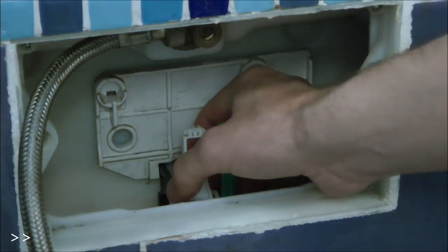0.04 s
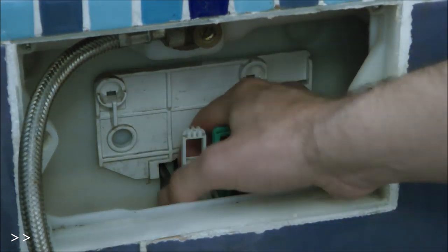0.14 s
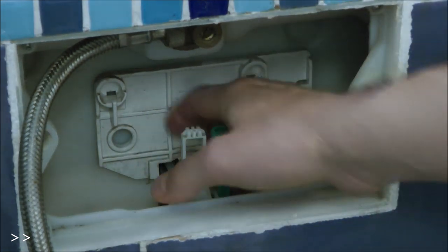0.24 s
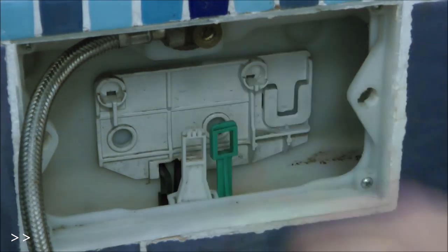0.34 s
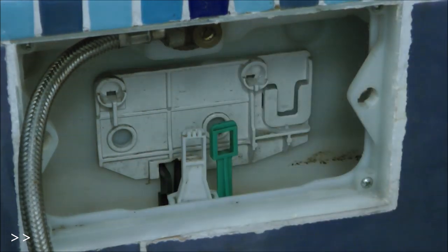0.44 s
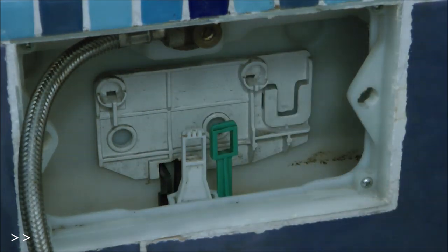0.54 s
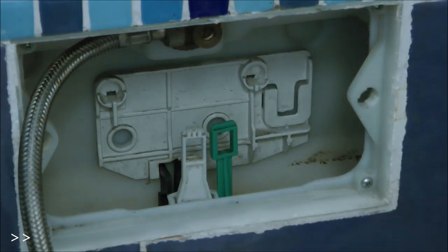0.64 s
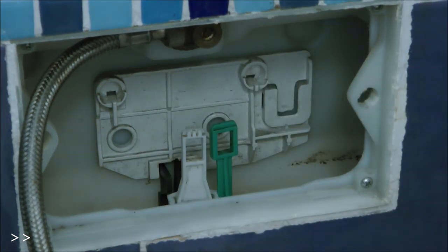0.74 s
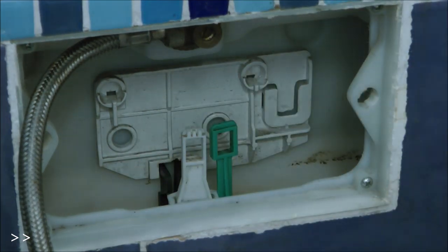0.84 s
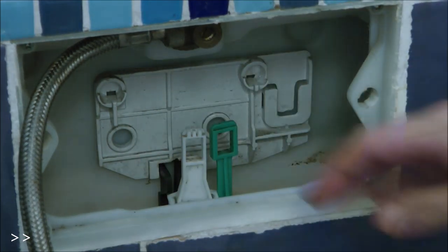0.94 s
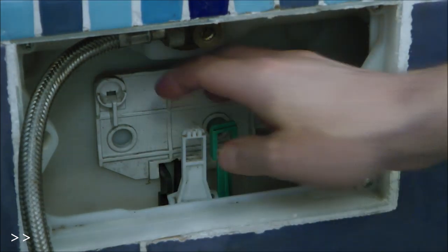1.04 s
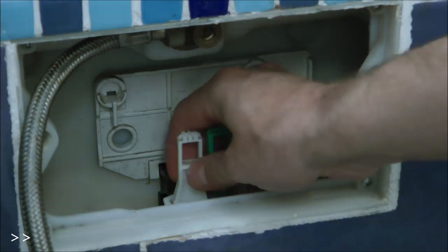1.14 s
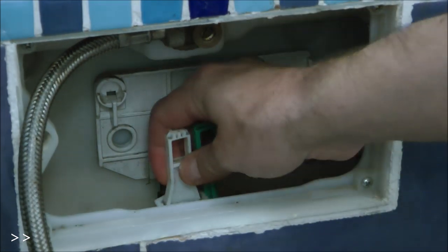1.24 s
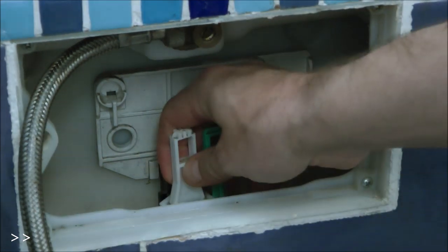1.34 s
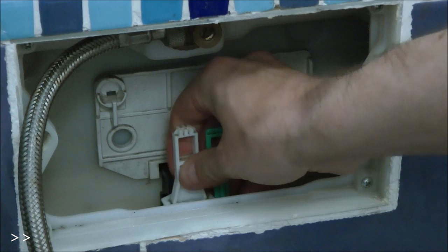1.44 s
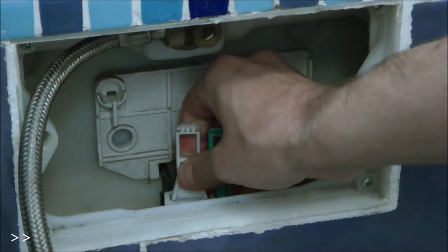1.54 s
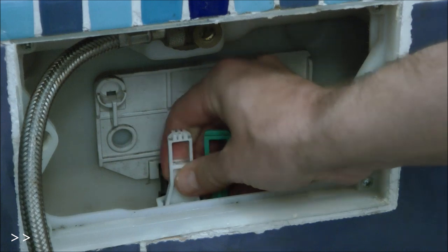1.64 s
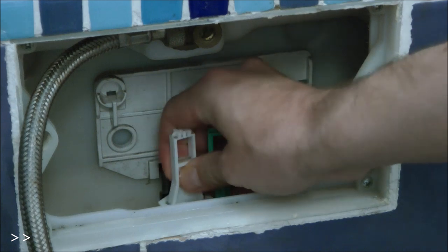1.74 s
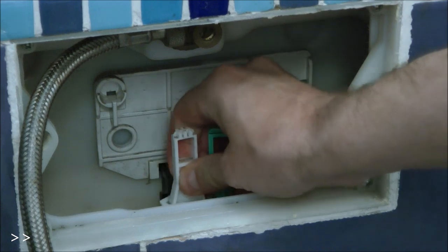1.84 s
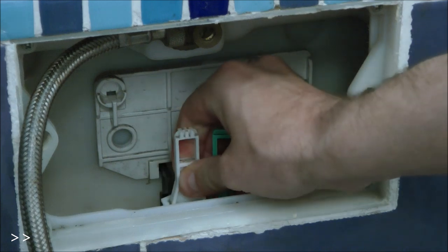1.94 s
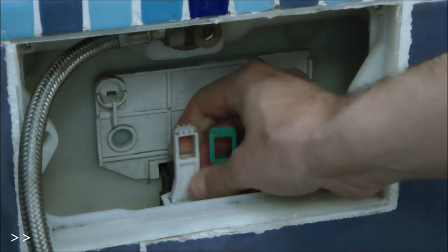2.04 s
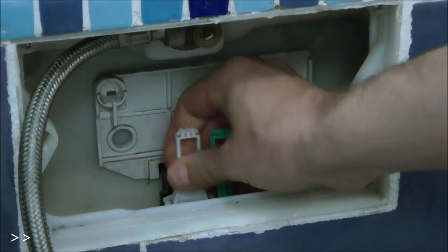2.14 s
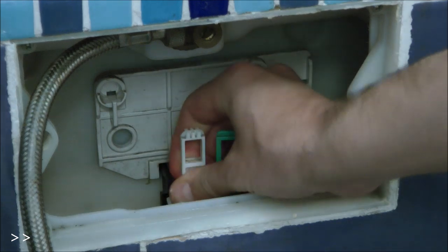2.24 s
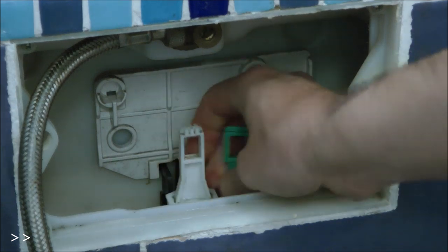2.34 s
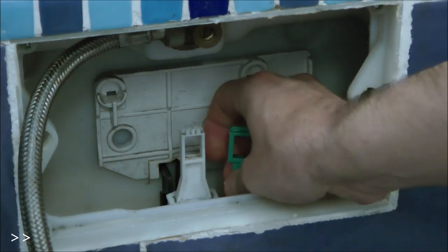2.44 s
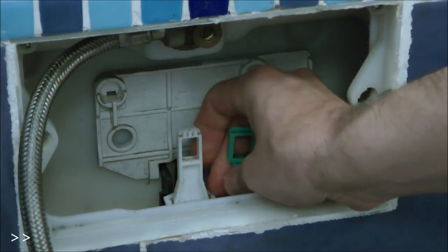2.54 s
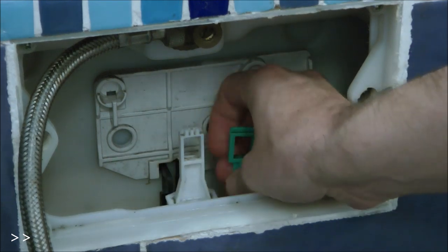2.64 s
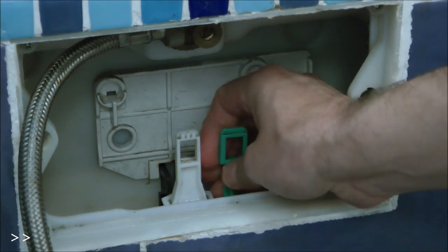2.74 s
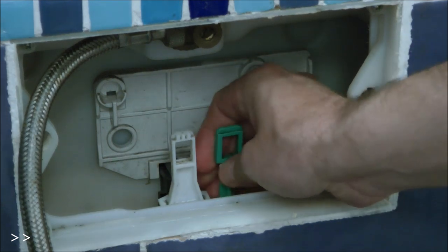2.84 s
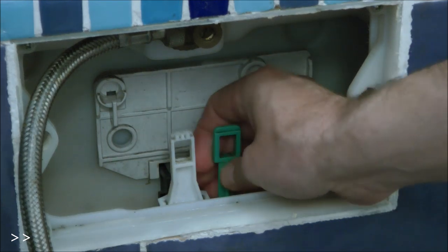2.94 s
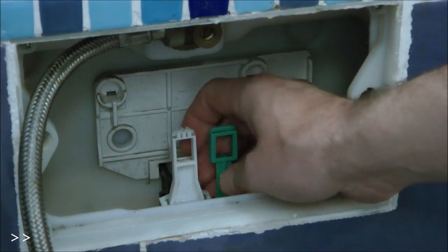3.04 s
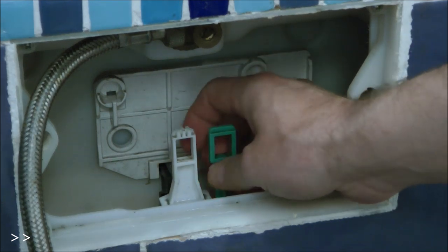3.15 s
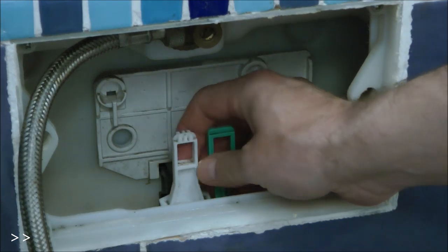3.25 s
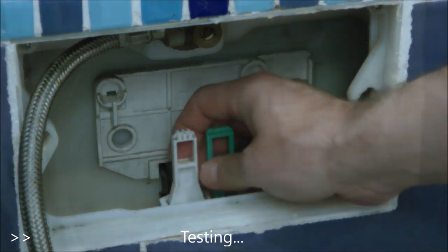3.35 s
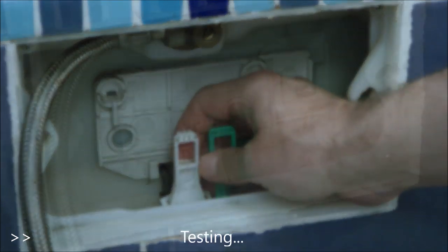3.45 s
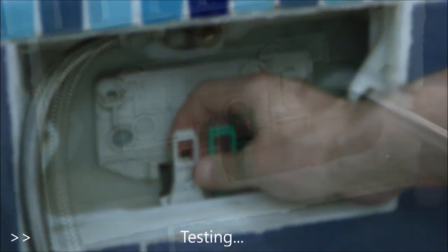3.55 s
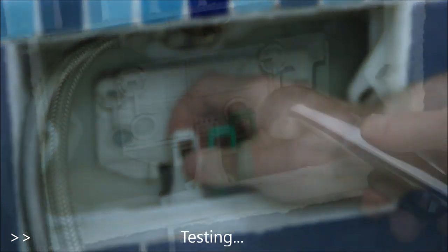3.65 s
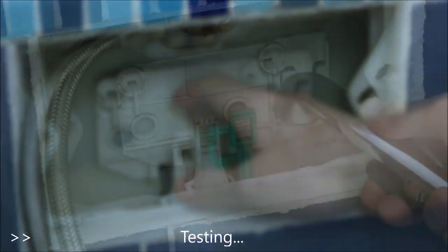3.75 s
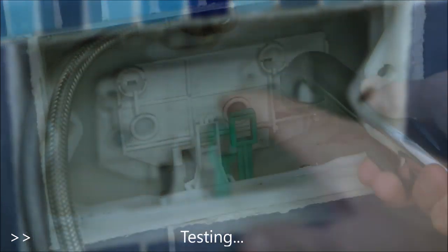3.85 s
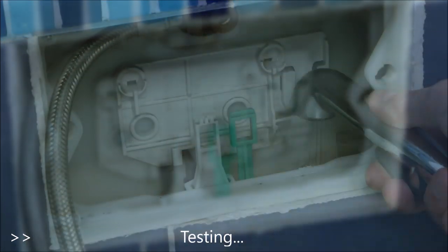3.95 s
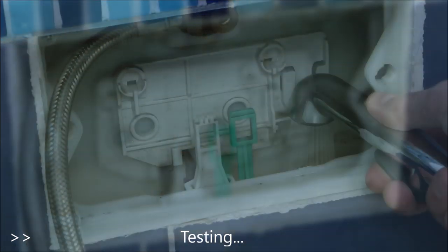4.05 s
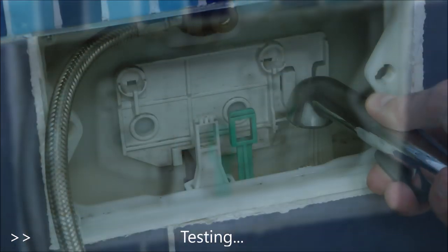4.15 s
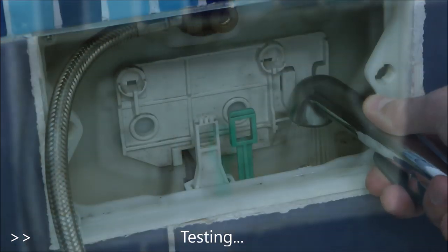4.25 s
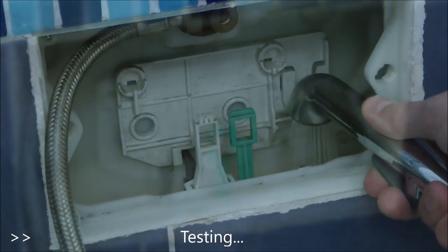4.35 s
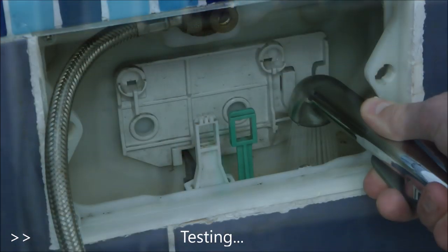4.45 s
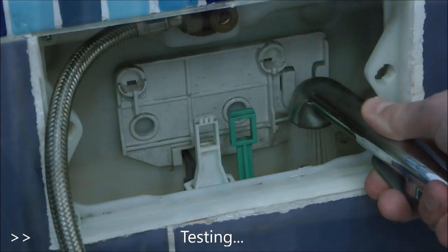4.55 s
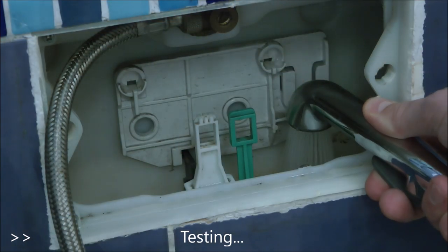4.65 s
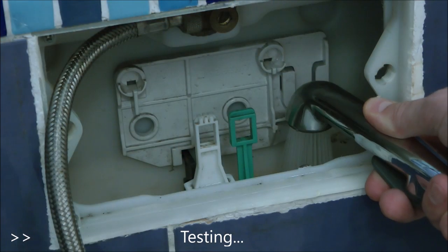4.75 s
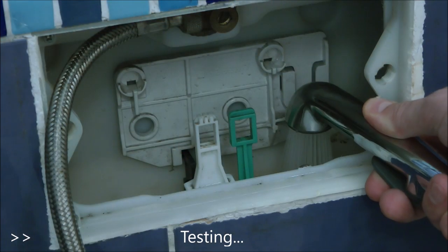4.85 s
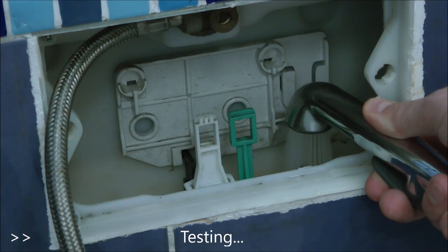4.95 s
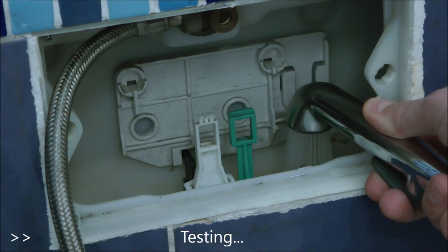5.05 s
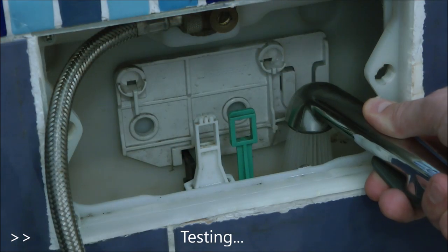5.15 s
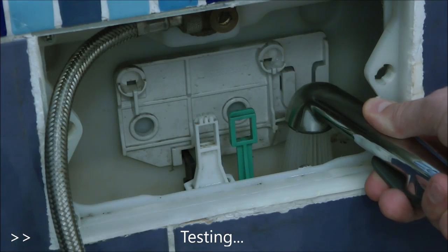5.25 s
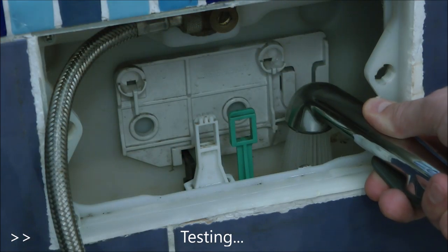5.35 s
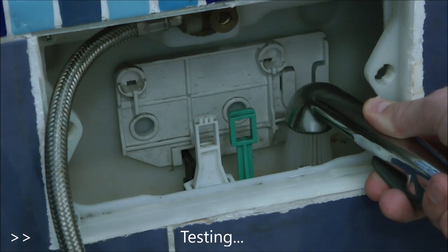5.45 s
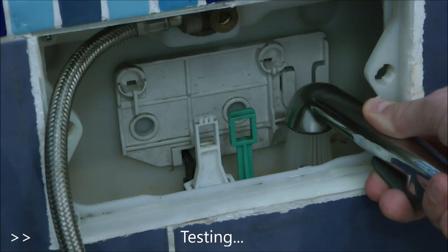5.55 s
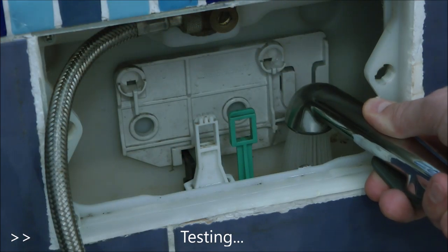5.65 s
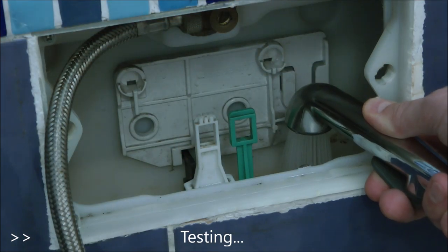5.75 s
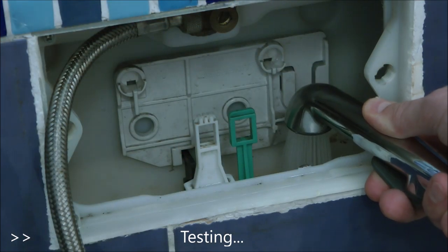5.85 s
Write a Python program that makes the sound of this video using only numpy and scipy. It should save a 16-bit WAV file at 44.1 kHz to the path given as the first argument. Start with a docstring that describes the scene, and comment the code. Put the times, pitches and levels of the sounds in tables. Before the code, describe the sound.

Close up in a small tiled room, fingers work plastic flush levers inside a hollow wall cistern: sharp clicks, short raspy scrapes and dull low knocks, with a quiet pause early on and one tiny rising squeak. Then water abruptly rushes through a pipe, and a hand shower takes over, hissing and splashing into the tank until the end.

```python
"""Plastic flush-valve levers scrape, click and knock in a hollow wall cistern: friction noise and impacts excite modes.
During the handling one lever squeaks by fast stick and slip, its pitch rising.
Then water rushes in through a pipe: turbulent noise rings at the pipe's fixed resonances.
Last, a hand shower sprays into the tank: many drop impacts hiss, the pool splashes, and air pockets bubble.
Room tone with a faint whine runs throughout; a small tiled room answers the handling, heard close by."""
import sys
import numpy as np
from scipy import signal
from scipy.fft import rfft, irfft, next_fast_len
from scipy.io import wavfile
from scipy.ndimage import uniform_filter1d

SR = 44100
rng = np.random.default_rng(int(sys.argv[2]) if len(sys.argv) > 2 else 0)


def transcribe(u):
    """Save the signal u as a 16-bit wav file named by the first command-line argument.

    u: samples, shape (n,) or (channels, n), limited to [-1, 1]; the rate is SR.
    q: integer samples, one column per channel.
    """
    v = np.clip(np.atleast_2d(u).T, -1, 1)
    q = np.round(v * 32767).astype(np.int16)
    wavfile.write(sys.argv[1], SR, q)


N = 260631  # samples

# spectrum of still air in the room: frequency_hz, level_db
AIR_SPECTRUM = [(15, -47), (25, -13), (70, -21.5), (195, -7), (326, -8.5), (962, -10.5), (1040, -16.5),
                (1840, -18), (2050, -28), (2350, -22.5), (3820, -21.5), (16000, -26.5)]
# room tone over time, sinking under the spray: time_s, level_db
AIR_LEVEL = [(0, -56.5), (3.4, -51), (4.7, -52), (4.9, -72), (5.91, -74)]
# steady tones of the whine: pitch_hz, level_db
WHINE_TONES = [(727, -73), (1039, -70), (2073, -66.5)]

# levers sliding under the fingers: start_s, length_s, scrape_db, rasp_over_scrape_db (before a trim)
SLIDES = [(0.0, 0.12, -51, -3), (0.17, 0.13, -55.5, -1), (0.33, 0.027, -45.5, -9),
          (1.219, 0.096, -44.5, -4), (1.382, 0.085, -45.5, 2), (1.497, 0.15, -47, 1), (1.69, 0.12, -44, 0),
          (1.892, 0.21, -57.5, -3.5), (2.1, 0.17, -43.5, -3.5), (2.379, 0.083, -44, 2), (2.5, 0.1, -52, -3),
          (2.624, 0.071, -45, -1.5), (2.8, 0.063, -48.5, -2), (2.938, 0.13, -56.5, -22),
          (3.111, 0.041, -50.5, -18)]
SLIDE_RISE_DB_PER_S, SLIDE_FALL_DB_PER_S = 418, 246
FLEX_DB, RASP_EDGE_DB = 6, -6.5  # tank flex over the scrape; gain of the edges under the rasp
GRIP_DB = 2  # unevenness of the grip
# skin and sleeve brushing past the opening: start_s, length_s, level_db
BRUSHES = [(0.69, 0.19, -59), (1.16, 0.048, -44), (1.35, 0.26, -47), (1.76, 0.037, -43),
           (3.13, 0.085, -49.5)]
BRUSH_RISE_DB_PER_S, BRUSH_FALL_DB_PER_S = 205, 234
# flexing tank wall: frequency_hz, level_db
FLEX_SPECTRUM = [(100, -34), (170, -19), (205, -35), (255, -5), (278, -24), (300, 3), (325, -7),
                 (358, -2.5), (400, -11.5), (520, -16), (800, -74)]
# lever body: frequency_hz, level_db
LEVER_SPECTRUM = [(350, -13), (550, -9.5), (820, 2.5), (1000, -9), (1160, -3), (1300, -14), (1500, -3.5),
                  (1850, -21), (2200, -13), (2600, -19.5), (3600, -31.5)]
# thin plastic tabs: frequency_hz, level_db
TAB_SPECTRUM = [(1800, -57.5), (2900, -5), (3300, -12), (3700, 5.5), (4000, -6), (4400, 0.5), (5000, -2.5),
                (5600, -3), (5950, -6), (6400, -18.5), (9000, -31.5)]
# sharp plastic edges: frequency_hz, level_db
EDGE_SPECTRUM = [(4500, -30), (6800, -3.5), (8000, 0.5), (11000, 1.5), (12800, -6), (13600, -5),
                 (16000, -9)]
# brushing skin: frequency_hz, level_db
SKIN_SPECTRUM = [(400, -2), (750, 15.5), (1500, -9), (2600, -9), (4000, 2), (7000, -5), (11200, -1.5),
                 (13000, -20), (16000, -18)]

# knocks on the tank wall: time_s, level_db, breadth_db (modes beside the main one), main_hz
KNOCKS = [(0.045, -29, -14, 323), (0.08, -26.5, -13, 330), (0.32, -11.5, -9, 348), (0.338, -24, -3.5, 297),
          (0.761, -42.5, -5, 258), (1.23, -17.5, -13, 320), (1.367, -27.5, 0, 312), (1.532, -18, -26, 323),
          (1.635, -19, -10, 313), (1.688, -6, -28, 330), (1.777, -20.5, -26, 324), (1.814, -22, -28, 310),
          (2.077, -25.5, -31, 310), (2.135, -20, -19, 302), (2.244, -17.5, -15, 340),
          (2.39, -20.5, -10, 372), (2.463, -26, -10, 323), (2.654, -25, -16, 322), (2.701, -25, -27, 332),
          (2.853, -21.5, -15.5, 305), (2.877, -24, -26, 307), (3.054, -24.5, -29, 332),
          (3.113, -22, -17, 316), (3.336, -29.5, -3, 348), (3.397, -21.5, -16, 304),
          (3.475, -22.5, -8.5, 303), (3.544, -29.5, -12, 298), (3.813, -22.5, -8, 304),
          (4.095, -29, -1, 245), (4.793, -36, -1, 335)]
# modes of the hollow tank: frequency_hz, level_db, t60_s
TANK_MODES = [(168.5, -17.5, 0.24), (241, -24, 0.3), (260.4, -10, 0.16), (307.5, -6.5, 0.3),
              (321.7, 0, 0.17), (349.1, -1, 0.11), (431, -10, 0.27), (464, -8, 0.091), (565, -21, 0.25),
              (750, -21, 0.076), (880, -14, 0.04), (862.6, -9.5, 0.13)]
LOW_MODES_DB, UPPER_MODES_DB = 11, 5
UPPER_SHARE = 0.41  # the upper modes follow only this share of the breadth

# lever clicks: time_s, level_db, clack_db (hollow), snap_db (sharp), tab_hz, lever_hz
CLICKS = [(0.0678, -31, 1, -10.5, 3580, 804), (0.2576, -37.5, 5, -12, 4200, 1438),
          (0.29, -42, -5, 0, 5710, 775), (0.3215, -26.5, 0, -7, 4080, 810),
          (0.3234, -27, -0.5, -4, 4270, 750), (0.9055, -39.5, -42, 7, 4330, 1060),
          (1.1673, -38.5, 9.5, -1.5, 3460, 780), (1.2925, -30.5, 4, -21, 3670, 866),
          (1.321, -30, -9, -9, 4560, 832), (1.4133, -20, -7, -13.5, 4280, 773),
          (1.4519, -19.5, -5, -18, 5460, 904), (1.6684, -15.5, -5, -6, 3670, 1165),
          (1.6782, -18.5, 0.5, -11, 3980, 1161), (1.774, -23.5, -3, -9.5, 5550, 850),
          (1.949, -40, 0, -4, 3670, 1033), (1.995, -35, 0.5, -6, 5100, 1540),
          (2.1121, -22.5, 1, -4, 3580, 1518), (2.16, -28.5, 3, -23, 3560, 916),
          (2.2283, -22.5, 5, -6.5, 3580, 817), (2.3604, -36.5, 6, -7, 4840, 776),
          (2.3979, -26.5, 3, -9, 3410, 873), (2.4553, -21.5, -4, -9.5, 3600, 907),
          (2.6255, -15.5, -5.5, -5, 5750, 849), (2.6823, -37, 7.5, -14, 3700, 1470),
          (2.8444, -26, -3, -9, 3710, 833), (3.0559, -36.5, 4, -4, 4600, 1546),
          (3.115, -47, 9, -12, 3500, 850), (3.331, -29, -7, -15, 3600, 894),
          (3.936, -22.5, 3, -3, 5600, 1734)]
# a click lasts longer the more of the lever's body it moves
CLICK_T60_S, CLACK_DB_PER_DOUBLING = 0.076, 25  # decay at a clack of 0 dB; clack that doubles it
CLICK_ATTACK_S, CRACK_SHARE = 0.00093, 0.31  # the first crack decays in a share of the whole click

# squeak of a lever pressed home
SQUEAK_S, SQUEAK_LENGTH_S, SQUEAK_DB, SQUEAK_FADE_DB_PER_S = 1.797, 0.03, -38.5, 700
SQUEAK_HZ, SQUEAK_HZ_PER_S = 997, 3600  # pitch at the start; steady climb

# water rushing in, swelling slowly, dying away as the shower takes over
INFLOW_S, INFLOW_LENGTH_S, INFLOW_DB, INFLOW_SWELL_DB_PER_S = 3.359, 0.647, -26.5, 2.5
INFLOW_RISE_DB_PER_S, INFLOW_FALL_DB_PER_S = 9009, 400
# rush in the pipe: frequency_hz, level_db
PIPE_SPECTRUM = [(150, -28), (500, -10.5), (650, -13.5), (1200, -3.5), (1600, 0.5), (2400, -1), (3300, -7),
                 (5500, -3.5), (6300, -9), (8000, -7), (10500, -8.5), (13000, -13), (16000, -16)]
# resonances of the pipe: frequency_hz, width_hz, lift_db
PIPE_RINGS = [(890, 50, 6), (1420, 60, 5), (1675, 130, 8.5), (1684, 22, 11), (2030, 60, 4), (2340, 80, 5),
              (2920, 90, 3), (5500, 200, 7.5)]

# strength of the shower jets: time_s, level_db
FLOW = [(4.05, -24.5), (4.106, -26), (4.436, -24), (4.538, -28), (5.178, -27.5), (5.446, -25.5),
        (5.9, -25.5)]
# how deep the jets dig into the pool: time_s, depth (0 to 1)
PLUNGE = [(4.05, 0.47), (4.25, 0.57), (4.42, 0.8), (4.5, 0.6), (4.65, 0.62), (4.85, 0.21), (5.2, 0.24),
          (5.9, 0.09)]
HISS_DB, SPLASH_DB, DEEP_DB, SHALLOW_DB = 3.5, -5.5, 4, -3.5  # each over the flow
SPLASH_SHALLOW_DB = -1  # change of the splash from deepest to shallowest jets
JET_S, JET_RISE_DB_PER_S = 4.04, 238  # the jets reach full pressure
SPLASH_S, SPLASH_RISE_DB_PER_S = 4.155, 38.5  # the splash builds slowly from a first dribble
# splashing pool: frequency_hz, level_db
POOL_SPECTRUM = [(100, -43), (220, -64), (340, -35), (420, -16), (550, -10.5), (610, 3), (900, 3),
                 (1050, 0), (1250, -8), (1800, -41)]
# bubbling under deep jets: frequency_hz, level_db
DEEP_SPECTRUM = [(400, -43), (900, -33), (1200, -3), (1500, -7), (1600, 4), (1850, -8), (2060, 8.5),
                 (2280, -5.5), (2500, -4), (2950, -11.5), (3500, -15.5)]
# bubbling under shallow jets: frequency_hz, level_db
SHALLOW_SPECTRUM = [(400, -42.5), (900, -18), (1250, -4), (1480, -26), (1700, 1), (1950, -3.5), (2150, -3),
                    (2250, 9.5), (2500, -5), (2800, 2), (3300, -22.5)]
# fine drops hitting the wall: frequency_hz, level_db
DROP_SPECTRUM = [(2200, -6), (3150, -4.5), (3750, 0.5), (4300, -2), (4700, -5), (5600, -1), (6500, -4),
                 (8100, 1.5), (10200, 0), (11800, -3), (13000, -4), (14300, -7), (15500, -4)]
# resonances of the air above the water: frequency_hz, width_hz, lift_db
CAVITY_RINGS = [(613, 22, 7), (733, 24, 4), (792, 25, -4), (837, 20, 12), (952, 18, 6), (990, 30, -4),
                (1024, 18, 4), (1140, 40, -4), (1255, 20, 5), (1329, 16, 8), (1411, 16, 7), (1454, 14, 8),
                (2214, 24, 5)]
# resonances of the wall under the drops: frequency_hz, width_hz, lift_db
WALL_RINGS = [(3820, 200, 2), (5940, 67, 6), (7520, 82, 6), (8020, 110, 4), (9430, 150, 5.5),
              (9980, 120, 7), (10450, 180, 6.5), (11200, 180, 4.5)]
# dips in the hiss that deepen as the jets dig less deep: frequency_hz, width_hz, lift_db
HISS_DIPS = [(3150, 280, -11), (4650, 280, -8), (5000, 200, -5), (6350, 220, -4)]

# decay of the tiled room: frequency_hz, t60_s
ROOM_DECAY = [(200, 0.11), (2000, 0.092), (6000, 0.094), (14000, 0.053)]
# left-right likeness: frequency_hz, correlation (-1 to 1)
STEREO_LIKENESS = [(60, -0.49), (150, 0.04), (330, 0.59), (800, 0.77), (1400, 0.48), (2300, 0.59),
                   (3200, 0.2), (3900, 0.049), (4600, 0.5), (8000, 0.33), (10500, 0.42), (13500, -0.089),
                   (16000, 0.6)]
# left minus right: frequency_hz, difference_db
STEREO_LEAN = [(60, -6), (130, 0.5), (300, -4), (1100, -3), (2000, -5.5), (3200, -5.5), (4500, -6),
               (5500, -4), (9500, -4), (12000, -7), (14000, -8.5), (16000, -5)]
TOP_HZ = 15900  # upper band limit


def amp(db):
    """Logarithmic level: decibels become an amplitude factor."""
    return 10 ** (np.asarray(db) / 20)


def unit(x):
    """Normalization: scale to rms 1."""
    return x / np.sqrt(np.mean(x ** 2) + 1e-20)


def along(points, hz):
    """Logarithmic frequency scale: interpolate (frequency, value) points on it."""
    f, v = np.transpose(points)
    return np.interp(np.log(hz + 1), np.log(f + 1), v)


def curves(rows):
    """Linear interpolation in time: one curve for each column after the time."""
    s, *cols = np.transpose(rows)
    return [np.interp(np.arange(N) / SR, s, c) for c in cols]


def wobble(rate):
    """Band-limited fluctuation: a smooth random curve with rate knots a second."""
    count = int(N * rate / SR) + 2
    fine = signal.resample(rng.standard_normal(count), 8 * count)
    return np.interp(np.linspace(0, len(fine) - 1, N), np.arange(len(fine)), fine)


def filtered(x, response):
    """Linear filtering: multiply the spectrum by a response of frequency."""
    m = next_fast_len(N + SR // 4)
    return irfft(rfft(x, m) * response(np.fft.rfftfreq(m, 1 / SR)), m)[..., :N]


def body(pair, spectrum, rings=(), size=8192):
    """Minimum-phase resonance: two drives ring a body of energy 1, mixed to a set left-right correlation."""
    hz = np.fft.rfftfreq(size, 1 / SR)
    lift_db = sum(db / (1 + (2 * (hz - center) / width) ** 2) for center, width, db in rings)
    gain = amp(along(spectrum, hz) + lift_db)
    low_hz, high_hz = spectrum[0][0], spectrum[-1][0]
    gain = gain / (1 + (hz / high_hz / 2) ** 4) / (1 + (low_hz / (hz + 1) / 2) ** 2)
    # folding the cepstrum onto positive time makes the response causal
    cepstrum = irfft(np.log(np.maximum(unit(gain), 1e-6)))
    cepstrum[1:size // 2] *= 2
    cepstrum[size // 2:] = 0
    # the turn divides the energy between mid and side
    turn = np.arccos(np.clip(along(STEREO_LIKENESS, hz), -.99, .99)) / 2
    responses = irfft(np.exp(rfft(cepstrum)) * np.array([np.cos(turn), np.sin(turn)]))
    mid, side = signal.fftconvolve(pair, responses, axes=1)[:, :N]
    return np.array([mid + side, mid - side])


def patter(rate, spread_db):
    """Random impact process: two channels of tiny hits at shared times, of uneven size, rms 1."""
    hit = rng.random(N) < rate / SR
    size = amp(spread_db * np.clip(rng.standard_normal(N), -2, 2))
    return unit(hit * size * rng.standard_normal((2, N)))


def add(track, s, sound):
    """Superposition: mix a sound in at time s."""
    start = max(round(s * SR), 0)
    part = track[..., start:start + sound.shape[-1]]
    part += sound[..., :part.shape[-1]]


def held(start, length, rise, fall):
    """Exponential growth and decay: attack, hold and release in dB, with slopes in dB a second."""
    t = np.arange(N) / SR - start
    return np.maximum(rise * np.minimum(t, 0) - fall * np.maximum(t - length, 0), -150)


def strokes(rows, rise, fall):
    """Dominance of the strongest: gain of a series of (start, length, dB) strokes."""
    return amp(np.max([db + held(s, length, rise, fall) for s, length, db in rows], axis=0))


def ringing(hz, t60, t):
    """Free vibration: one exponentially damped mode of energy 1."""
    mode = amp(-60 * t / t60) * np.sin(2 * np.pi * hz * t)
    return mode / np.linalg.norm(mode)


def room_tone():
    """Stationary background: filtered noise of still air and faint steady sinusoids."""
    t = np.arange(N) / SR
    whine = sum(amp(db) * np.sqrt(2) * np.sin(2 * np.pi * hz * t + .2 * wobble(rate=4))
                for hz, db in WHINE_TONES)
    air = body(rng.standard_normal((2, N)), AIR_SPECTRUM)
    return amp(curves(AIR_LEVEL)[0]) * air + whine


def rubbing():
    """Stick-slip friction: small slips rasp on tabs, scrape the lever and flex the tank; skin brushes the rim."""
    s, length, scrape_db, rasp_db = np.transpose(SLIDES)
    grip = amp(GRIP_DB * wobble(rate=45))
    force = grip * strokes(zip(s, length, scrape_db), SLIDE_RISE_DB_PER_S, SLIDE_FALL_DB_PER_S)
    on_tabs = grip * strokes(zip(s, length, scrape_db + rasp_db), SLIDE_RISE_DB_PER_S, SLIDE_FALL_DB_PER_S)
    flex = amp(FLEX_DB) * force * body(patter(rate=750, spread_db=4.5), FLEX_SPECTRUM)
    scrape = body(force * patter(rate=1100, spread_db=2), LEVER_SPECTRUM)
    slips = on_tabs * patter(rate=1800, spread_db=2.5)
    rough_slips = amp(-4.5 + 4.4 * wobble(rate=70)) * slips
    rasp = body(rough_slips, TAB_SPECTRUM) + amp(RASP_EDGE_DB) * body(slips, EDGE_SPECTRUM)
    brushing = np.sqrt(grip) * strokes(BRUSHES, BRUSH_RISE_DB_PER_S, BRUSH_FALL_DB_PER_S)
    skin = brushing * body(rng.standard_normal((2, N)), SKIN_SPECTRUM)
    return flex + scrape + rasp + skin


def knocks():
    """Modal excitation: the valve bumps the hollow tank, and where it lands decides which modes wake."""
    out, t = np.zeros(N), np.arange(SR // 2) / SR
    hz, level_db, t60 = np.transpose(TANK_MODES)[:, :, None]
    upper, lower = hz > 400, hz < 280
    for s, db, breadth_db, main_hz in KNOCKS:
        size, detune = rng.standard_normal((2, len(TANK_MODES), 1))
        upper_db = upper * (UPPER_MODES_DB + UPPER_SHARE * breadth_db)
        lower_db = lower * (LOW_MODES_DB + breadth_db)
        main_db = 7 / (1 + ((hz - main_hz) / 18) ** 2)
        gain = amp(level_db + upper_db + lower_db + main_db + 2.4 * size - 60 * t / t60)
        modes = gain * np.sin(2 * np.pi * hz * (1 + 0.0071 * detune) * t)
        ring = modes.sum(0) * (1 - np.exp(-t / 0.0087))  # soft onset
        add(out, s, amp(db - 4.0) * ring / np.abs(ring).max())
    return np.array([out, out])


def clicks():
    """Impulsive release: a catch cracks, ringing tab and lever, then chatters out in uneven micro-hits."""
    clack, tab, snap, ring = np.zeros((4, 2, N))
    t = np.arange(SR // 4) / SR
    for s, db, clack_db, snap_db, tab_hz, lever_hz in CLICKS:
        t60 = CLICK_T60_S * 2 ** (clack_db / CLACK_DB_PER_DOUBLING)
        decay = amp(-60 * t / t60) + amp(-60 * t / (CRACK_SHARE * t60))
        fade = decay * (1 - np.exp(-t / CLICK_ATTACK_S))
        micro_hits = signal.resample(rng.standard_normal(size=90), len(t))
        chatter = amp(2.6 * micro_hits * np.minimum(t / 0.0081, 1))
        burst = amp(db - 12) * fade * chatter * rng.standard_normal((2, len(t)))
        tab_ring = amp(db + 12) * ringing(tab_hz, 0.024, t)
        lever_ring = amp(db + clack_db + 13) * ringing(lever_hz, 0.13, t)
        add(ring, s, tab_ring + lever_ring)
        add(tab, s, burst)
        add(clack, s, amp(clack_db) * burst)
        add(snap, s, amp(snap_db) * burst)
    hollow = amp(0.2) * body(clack, LEVER_SPECTRUM)
    sharp = amp(5.5) * body(snap, EDGE_SPECTRUM)
    return ring + body(tab, TAB_SPECTRUM) + hollow + sharp


def squeak():
    """Fast stick-slip oscillation: a short, rough tone of rising pitch."""
    since_start = np.arange(N) / SR - SQUEAK_S
    hz = SQUEAK_HZ + SQUEAK_HZ_PER_S * np.clip(since_start, -SQUEAK_LENGTH_S, SQUEAK_LENGTH_S)
    phase = 2 * np.pi * np.cumsum(hz * (1 + .08 * wobble(rate=400))) / SR
    level_db = SQUEAK_DB + held(SQUEAK_S, SQUEAK_LENGTH_S, SQUEAK_FADE_DB_PER_S, SQUEAK_FADE_DB_PER_S)
    return amp(level_db + 2.7 * wobble(rate=150)) * np.sin(phase)


def inflow():
    """Turbulent pipe flow: water starts at once and its rush rings the narrow pipe at fixed pitches."""
    swell_db = INFLOW_SWELL_DB_PER_S * (np.arange(N) / SR - INFLOW_S)
    envelope_db = held(INFLOW_S, INFLOW_LENGTH_S, INFLOW_RISE_DB_PER_S, INFLOW_FALL_DB_PER_S)
    rush = amp(.7 * wobble(rate=30)) * patter(rate=9000, spread_db=2)
    return amp(INFLOW_DB + swell_db + envelope_db) * body(rush, PIPE_SPECTRUM, PIPE_RINGS)


def bubbles(count, cycles, spread_db, size=900):
    """Bubble resonance: trapped air pockets each give a short damped tone that rises a little."""
    when, pitch, loud, side = rng.random((4, count, 1))
    hz = 1100 * 2.5 ** pitch
    turns = hz * np.arange(size) / SR
    gain = amp(-spread_db * np.log(loud + .02) - 60 * turns / cycles)
    tone = gain * np.sin(2 * np.pi * turns * (1 + 0.15 * turns / cycles))
    at = (when * N).astype(int) + np.arange(size)
    channel_gains = np.cos(2 * np.pi * side), np.sin(2 * np.pi * side)
    return unit(np.array([np.bincount(at.ravel(), (tone * g).ravel(), N)[:N] for g in channel_gains]))


def spray():
    """Jet impact: one flow drives wall hiss, splash and bubbling, which thins as the jets plunge less deep."""
    t = np.arange(N) / SR
    flow_db, = curves(FLOW)
    plunge = np.clip(curves(PLUNGE)[0], 0, 1)
    splash_build_db = SPLASH_RISE_DB_PER_S * np.minimum(t - SPLASH_S, 0)
    splash_db = SPLASH_DB + SPLASH_SHALLOW_DB * (.5 - plunge) + splash_build_db
    pool = body(patter(rate=3000, spread_db=4.5), POOL_SPECTRUM, CAVITY_RINGS)
    splash = amp(splash_db + 0.71 * wobble(rate=14)) * pool
    pockets = bubbles(count=5000, cycles=27, spread_db=-3.0) + 3.5 * patter(rate=5000, spread_db=1.5)
    deep = unit(body(pockets, DEEP_SPECTRUM, CAVITY_RINGS))
    shallow = unit(body(pockets[::-1], SHALLOW_SPECTRUM, CAVITY_RINGS))
    froth = amp(DEEP_DB) * plunge * deep + amp(SHALLOW_DB) * np.sqrt(1 - plunge) * shallow
    drops = patter(rate=22000, spread_db=0.5)
    full_hiss = body(drops, DROP_SPECTRUM, WALL_RINGS)
    hollow_hiss = body(drops, DROP_SPECTRUM, list(WALL_RINGS) + list(HISS_DIPS))
    hiss = plunge * full_hiss + (1 - plunge) * hollow_hiss
    jets = amp(JET_RISE_DB_PER_S * np.minimum(t - JET_S, 0)) * (froth + amp(HISS_DB) * hiss)
    return amp(flow_db + 0.37 * wobble(rate=28)) * (splash + jets)


def patchy(x, depth_db):
    """Spectral fluctuation: colour drifts in patches some hundred Hz by a tenth of a second, as jets wander."""
    z = signal.stft(x, nperseg=512)[2]
    field = uniform_filter1d(rng.standard_normal(z.shape[1:]), size=4, axis=0)
    field = uniform_filter1d(field, size=24, axis=1)
    return signal.istft(z * amp(depth_db * unit(field)), nperseg=512)[1][:, :N]


def tiles(x):
    """Reverberation: the small tiled room answers with decaying noise whose top treble dies first."""
    hz, t, z = signal.stft(rng.standard_normal((2, SR // 2)), SR, nperseg=256)
    decay = amp(-60 * t / along(ROOM_DECAY, hz)[:, None])
    tail = signal.istft(z * decay, SR, nperseg=256)[1]
    tail = np.pad(tail / np.linalg.norm(tail[0]), ((0, 0), (SR // 200, 0)))  # 5 ms delay
    return signal.fftconvolve(x, tail, axes=1)[:, :N]


def scene():
    """Superposition of sources: handling, then water, over room tone, leaning a little to the right."""
    plastic, bumps = clicks() + rubbing() + squeak(), knocks()
    water = patchy(inflow() + spray(), depth_db=1.6)
    faint_bumps = amp(-22) * bumps
    room = tiles(amp(-4.5) * plastic + faint_bumps)
    mix = plastic + bumps + room + water + room_tone()
    return filtered(mix, lambda hz: amp(np.array([[1], [-1]]) * along(STEREO_LEAN, hz) / 2))


def record(dry):
    """Band limitation: nothing passes above the upper limit."""
    return filtered(dry, lambda hz: hz < TOP_HZ)


dry = scene()
out = record(dry)
transcribe(out)
```